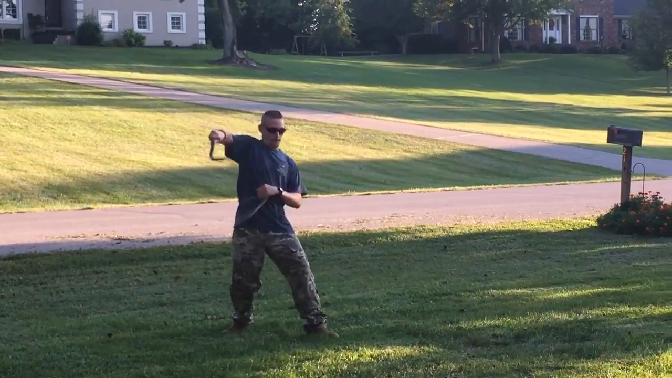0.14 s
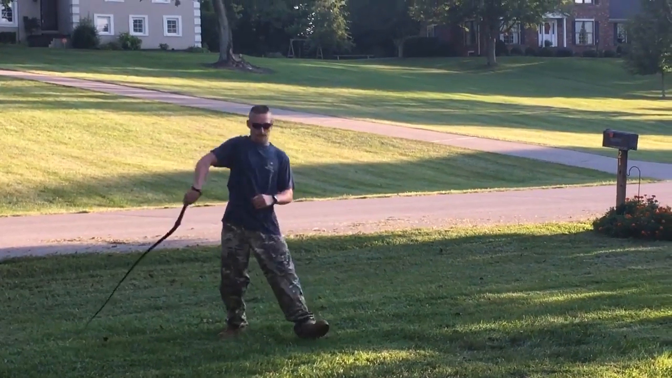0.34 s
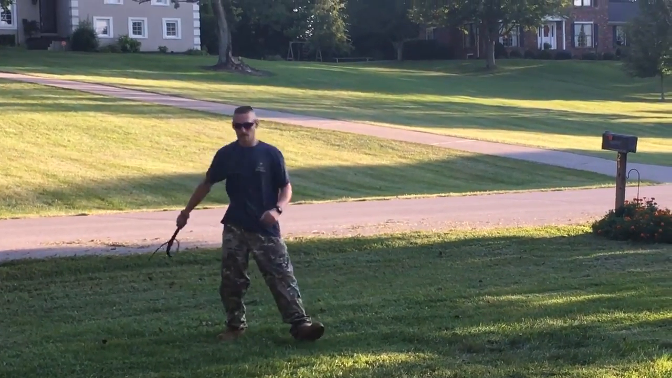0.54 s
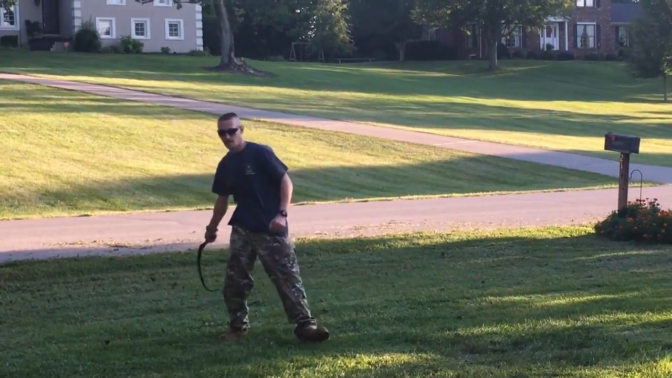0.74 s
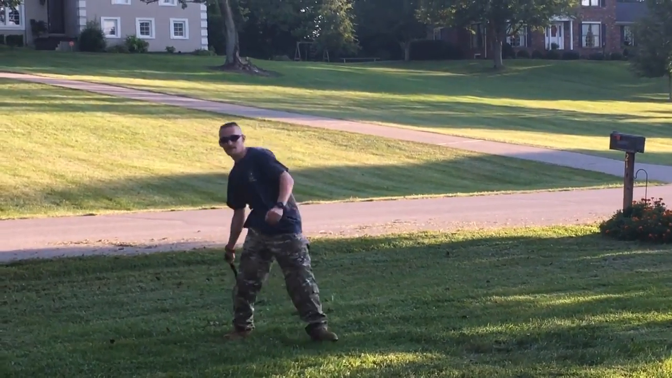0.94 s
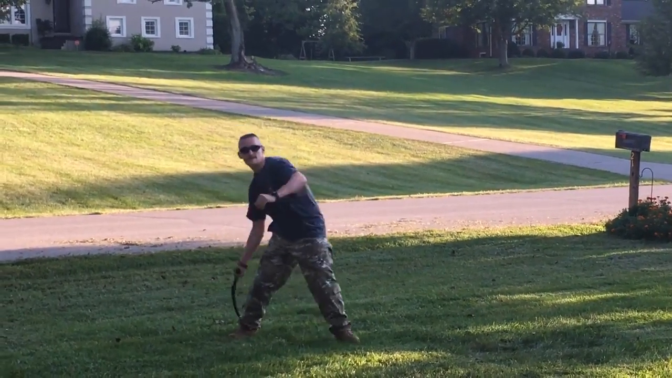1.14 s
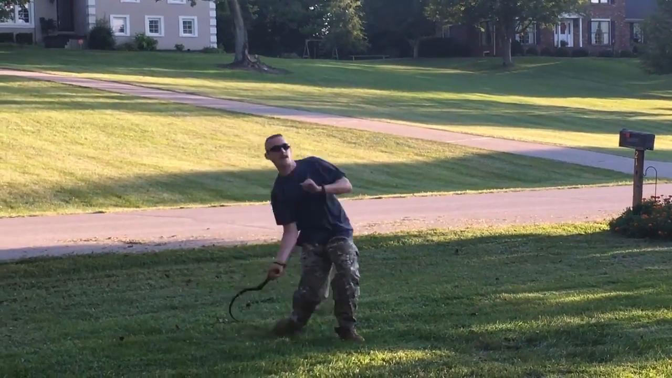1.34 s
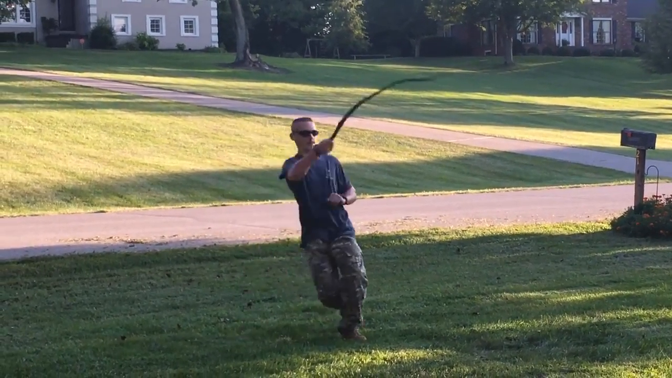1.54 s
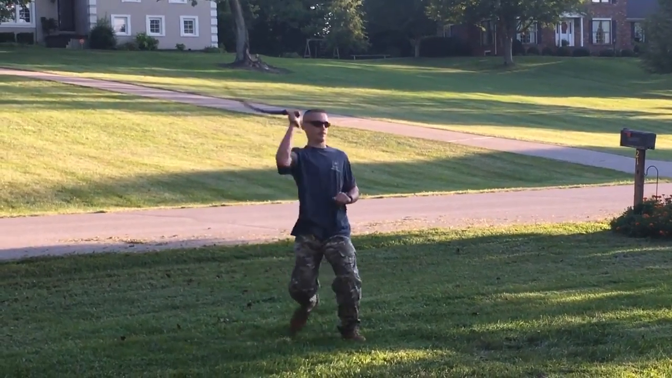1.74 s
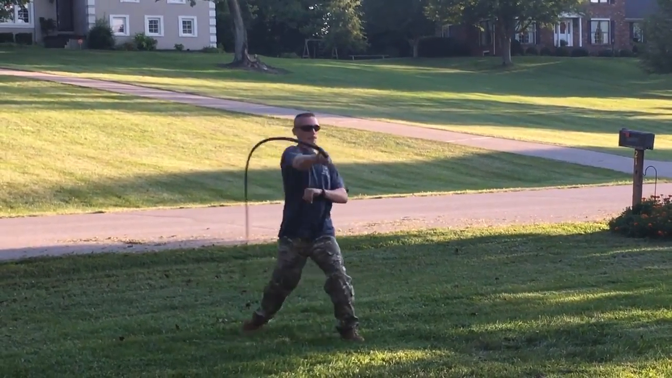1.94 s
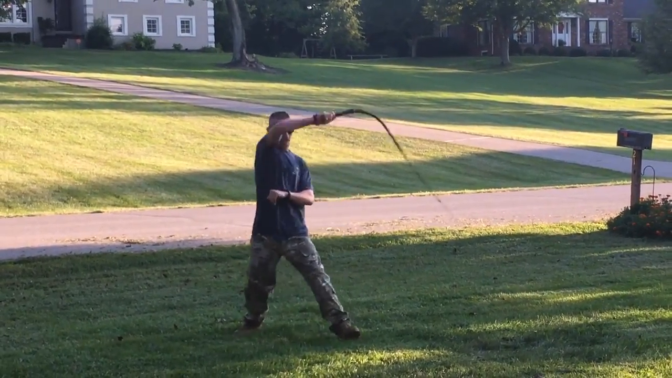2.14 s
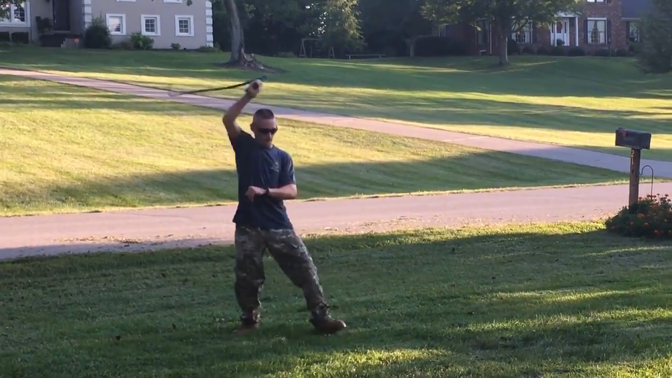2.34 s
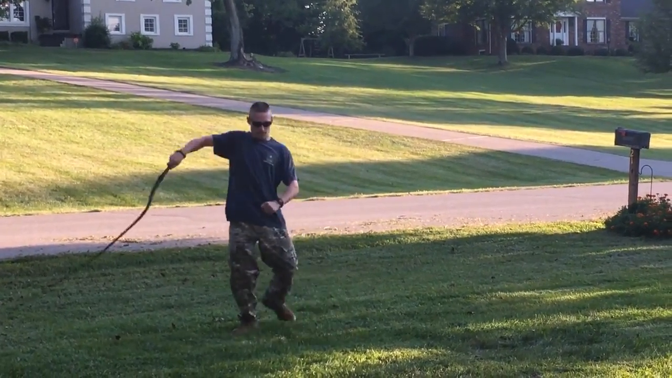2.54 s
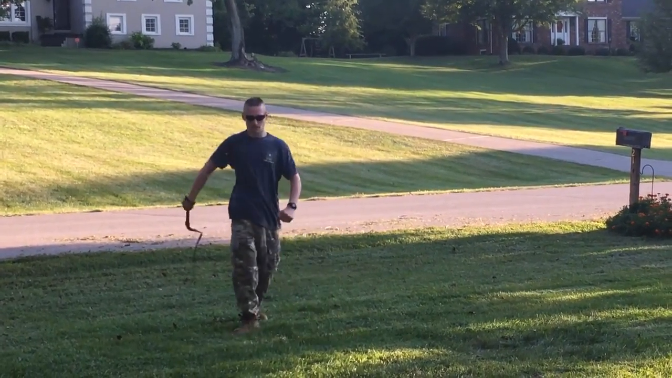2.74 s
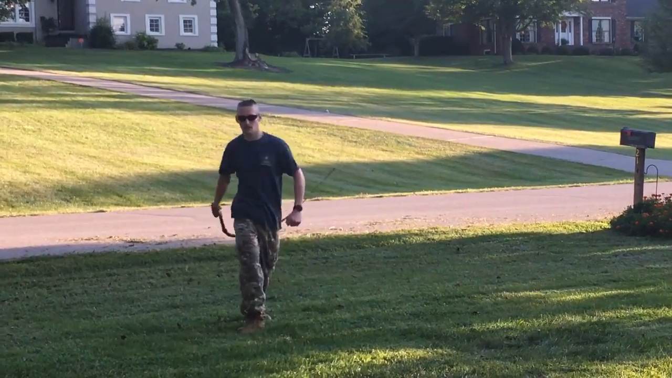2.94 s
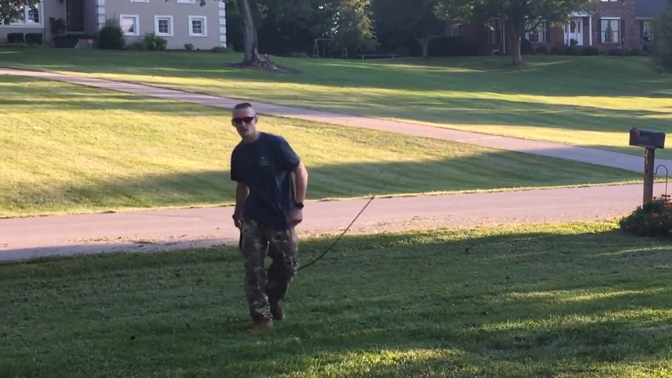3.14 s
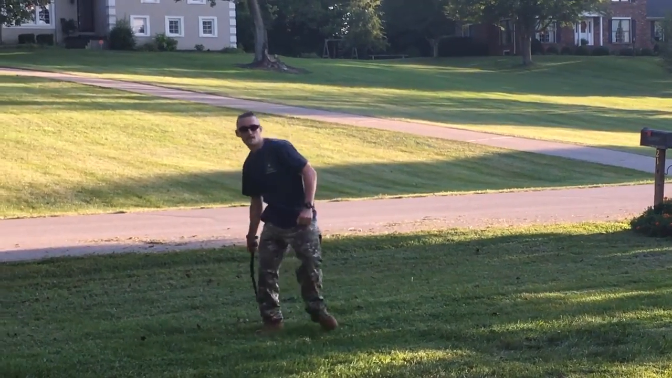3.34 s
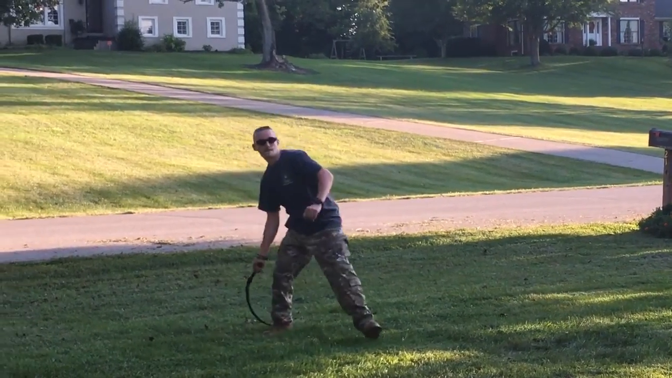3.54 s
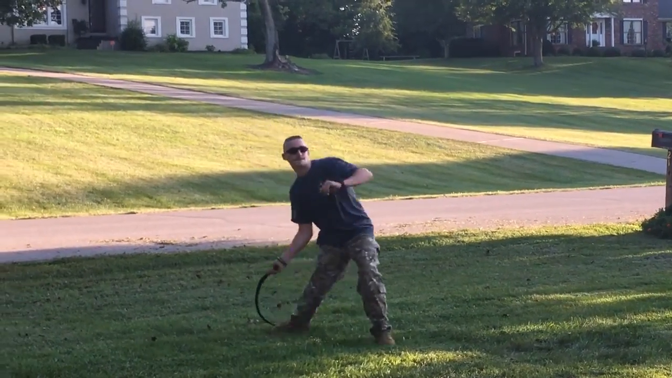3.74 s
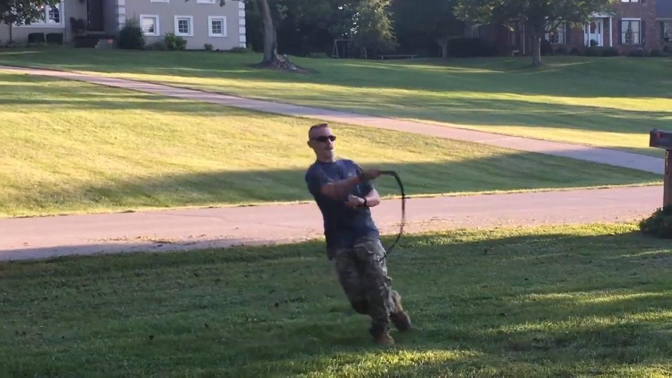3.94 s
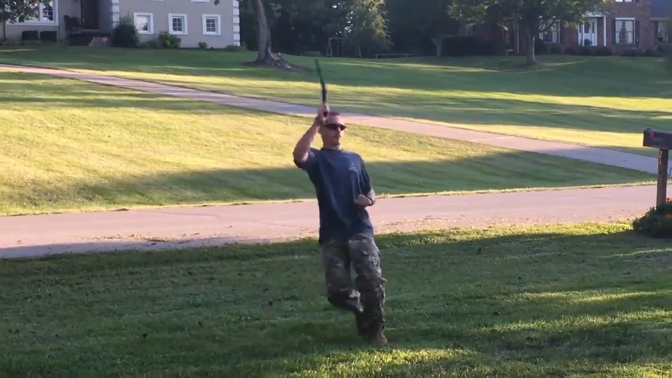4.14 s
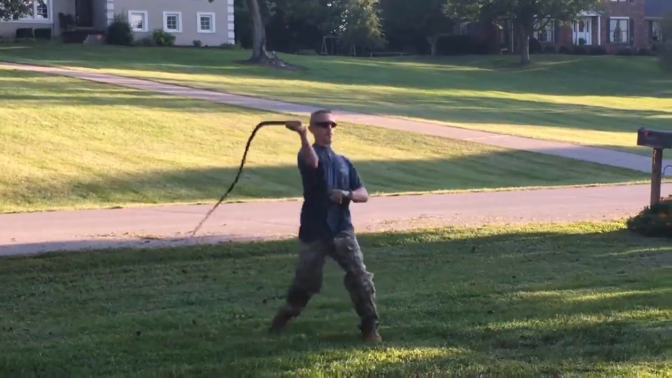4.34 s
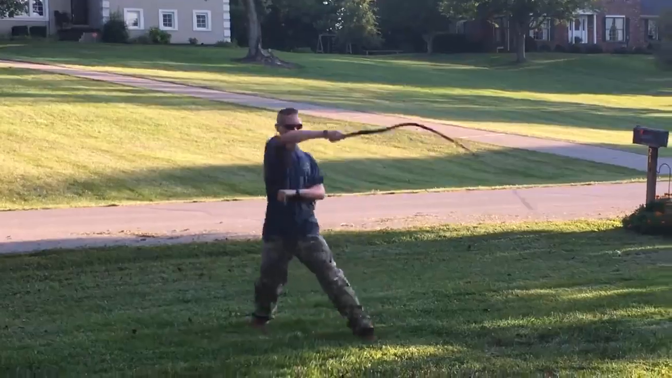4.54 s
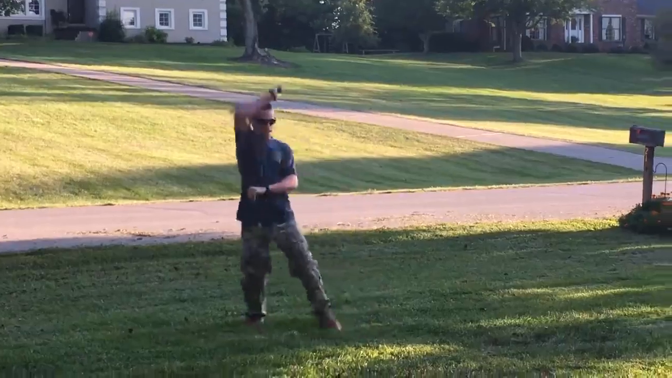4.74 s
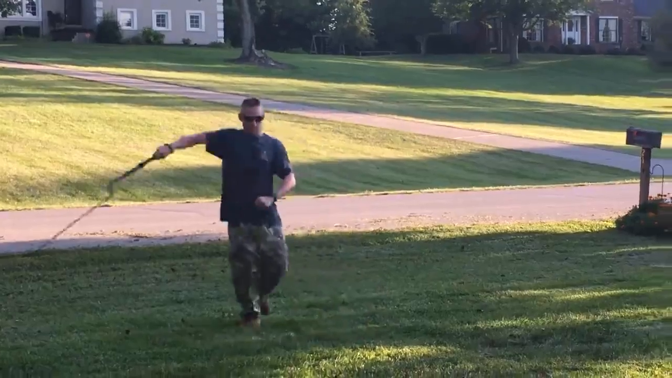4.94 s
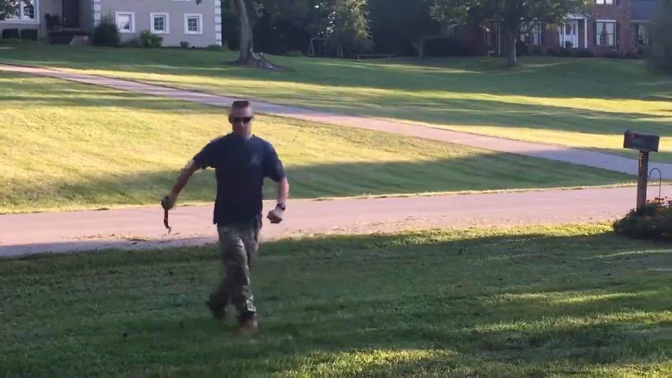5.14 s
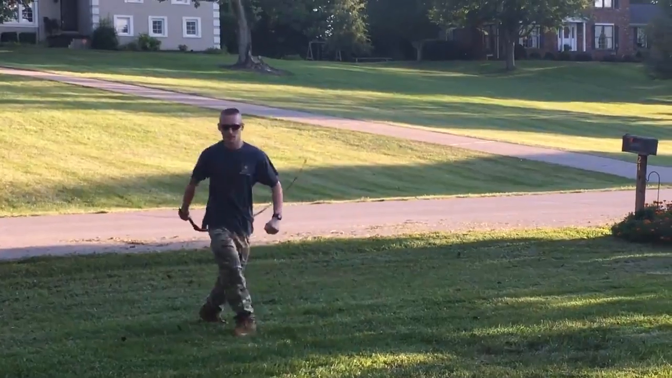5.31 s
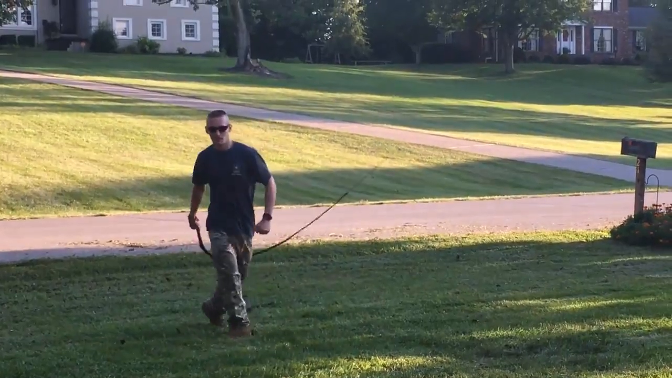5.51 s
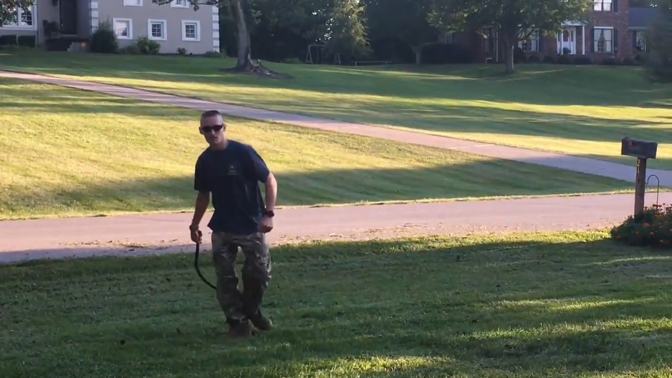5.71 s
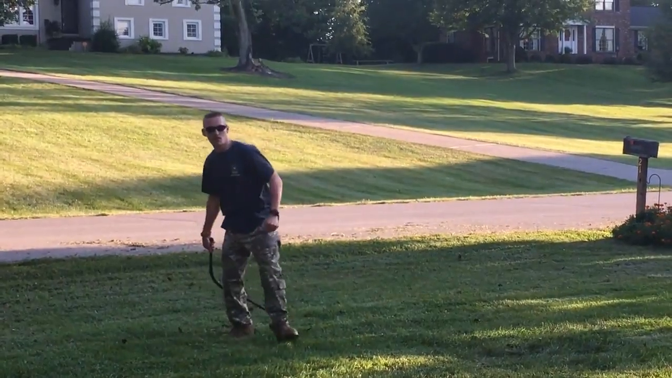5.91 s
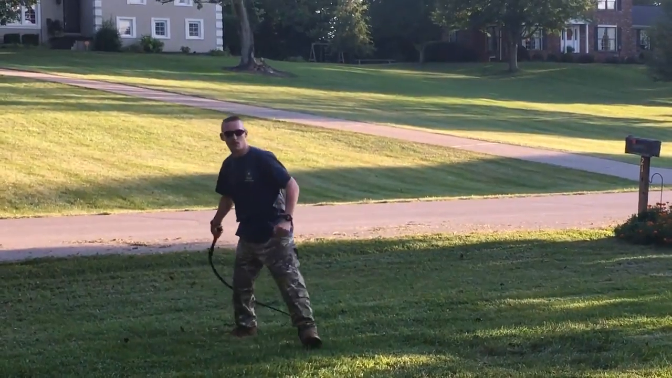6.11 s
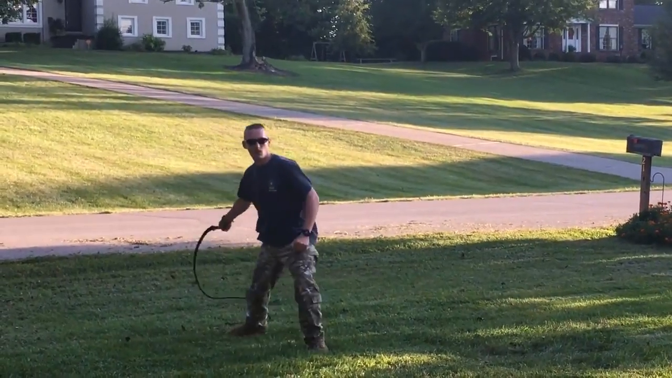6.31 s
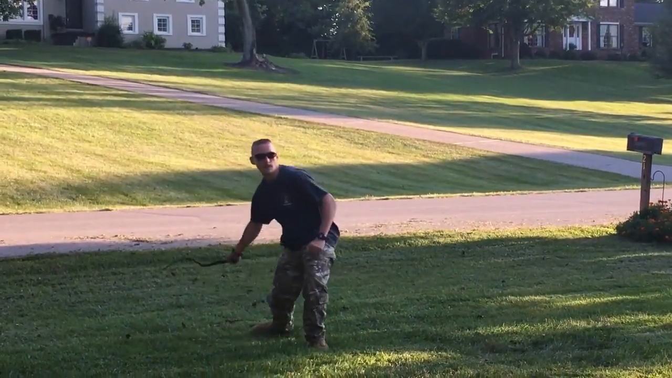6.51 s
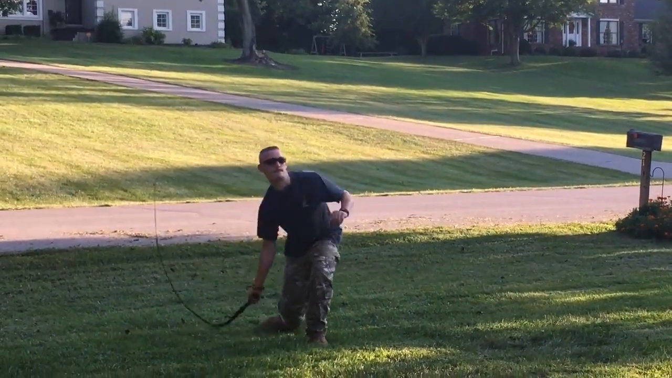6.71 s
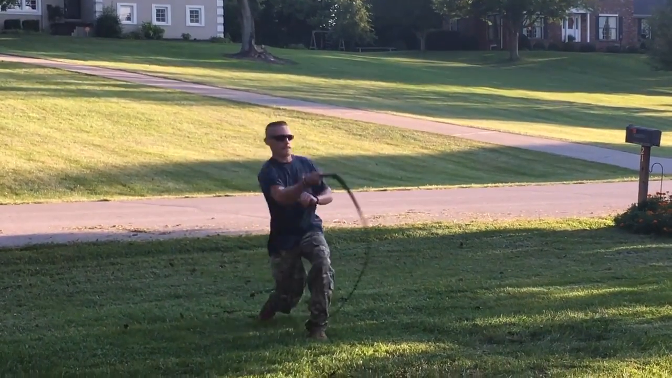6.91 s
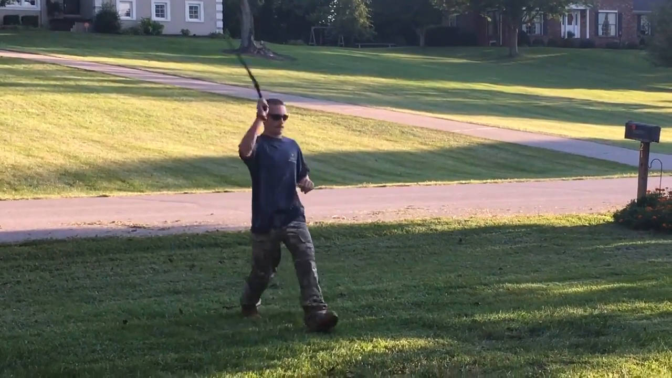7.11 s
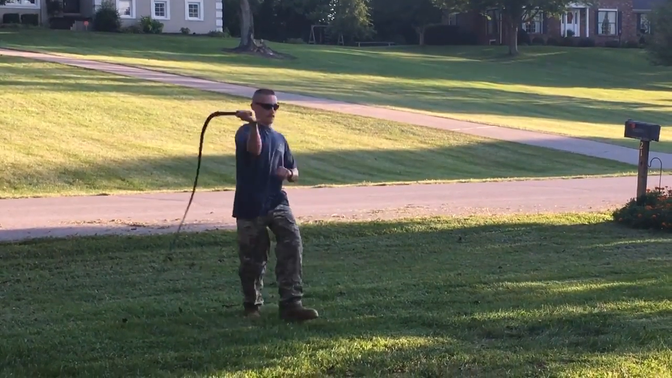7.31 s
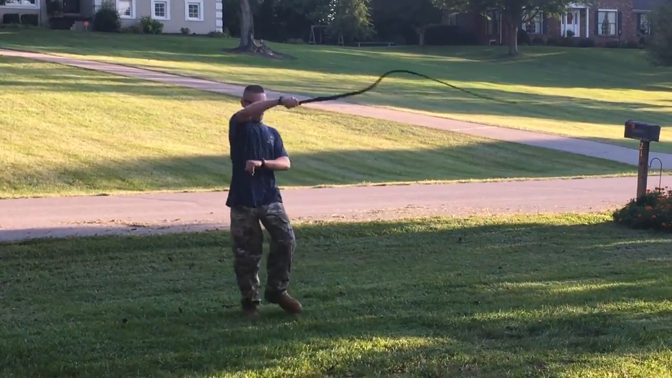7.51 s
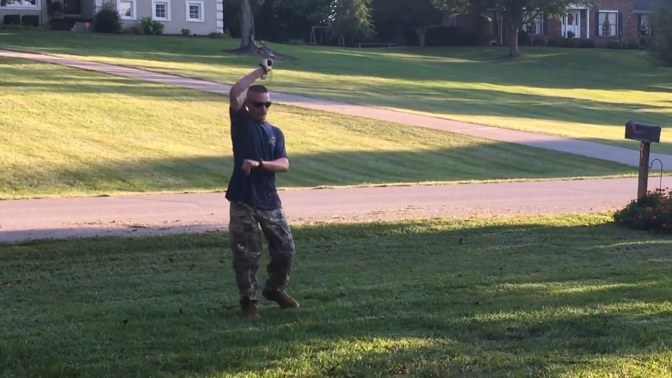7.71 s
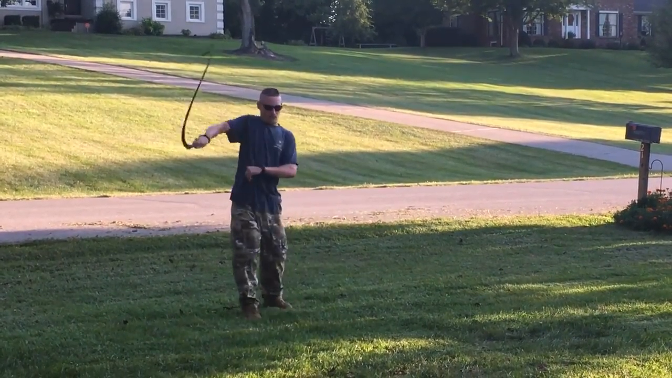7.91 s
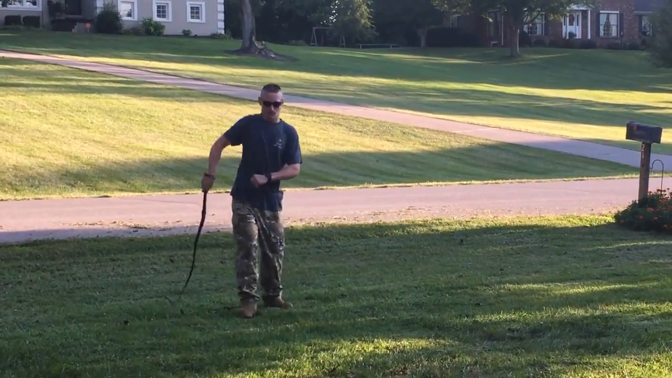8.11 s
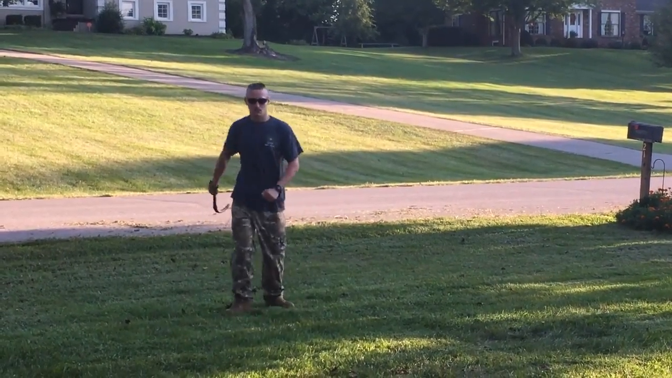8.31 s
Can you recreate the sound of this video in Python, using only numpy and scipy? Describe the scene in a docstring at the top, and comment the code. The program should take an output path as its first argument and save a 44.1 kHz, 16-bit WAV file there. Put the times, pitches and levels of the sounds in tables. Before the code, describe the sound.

A long whip cracks once, then in three groups of three, each crack about half a second apart within a group. Brief whistles and swishes lead into the cracks, which echo off house walls and distant trees. Most jolt the close microphone with a bass thump, briefly dipping the sound. Faint insects and a far engine hum lie behind on the open lawn.

```python
"""A lawn with houses and a tree line around it; a camera microphone stands close to a long whip.
The whip is cracked ten times, mostly in groups of three: the thong whistles, its supersonic tip sends
a shock, and the yard, the walls and the far trees answer. An engine hums far off and insects sing.
Most cracks jolt the microphone into a bass thump; after the strong thumps the camera's gain control
ducks the sound."""
import sys
import numpy as np
from scipy import signal
from scipy.fft import rfft, irfft, next_fast_len
from scipy.io import wavfile
from scipy.ndimage import uniform_filter1d, map_coordinates

SR = 44100
rng = np.random.default_rng(int(sys.argv[2]) if len(sys.argv) > 2 else 0)


def to_wav(s):
    """Save 16-bit WAV."""
    ch = np.atleast_2d(s).T  # columns
    pcm = np.round(np.clip(ch, -1, 1) * 32767)  # PCM
    wavfile.write(sys.argv[1], SR, pcm.astype(np.int16))


N = 368676
TIME = np.arange(N) / SR


def amp(db):
    """Decibels to gain."""
    return 10 ** (np.asarray(db) / 20)


def unit(x):
    """Scale to rms 1."""
    return x / np.sqrt(np.mean(x ** 2) + 1e-20)


def along(points, hz):
    """(Hz, value) points read on a log axis."""
    point_hz, values = np.transpose(points)
    return np.interp(np.log(hz + 1), np.log(point_hz + 1), values)


def curve(rows, t):
    """(s, value) rows joined by straight lines."""
    return np.interp(t, *np.transpose(rows))


def filtered(x, response):
    """Filter x with a gain given as a function of frequency."""
    size = next_fast_len(len(x) + 8192)
    return irfft(rfft(x, size) * response(np.fft.rfftfreq(size, 1 / SR)), size)[:len(x)]


def noise(spectrum, size, tilt_db=0):
    """Coloured noise of rms 1, tilted by so many dB per octave."""
    def colour(hz):
        return amp(along(spectrum, hz) + tilt_db * np.log2(np.maximum(hz, 200) / 2000))
    return unit(filtered(rng.standard_normal(size), colour))


def wobble(rate, size):
    """A smooth random curve with rate knots a second."""
    knots = rng.standard_normal(int(size * rate / SR) + 4)
    return map_coordinates(knots, [np.arange(size) * rate / SR])


def click(spectrum, size=1024):
    """The sharpest causal pulse with this spectrum (minimum phase), peak 1."""
    cepstrum = irfft(np.log(amp(along(spectrum, np.fft.rfftfreq(size, 1 / SR)))))
    cepstrum[1:size // 2] *= 2
    cepstrum[size // 2 + 1:] = 0
    pulse = irfft(np.exp(rfft(cepstrum)))
    return pulse / np.abs(pulse).max()


def add(track, s, sound):
    """Mix a sound into the track from time s."""
    start = round(s * SR)
    part = sound[:max(N - start, 0)]
    track[start:start + len(part)] += part


# Background of the open lawn: (frequency [Hz], relative level [dB])
AIR_SPECTRUM = [(22, -24.5), (50, 17), (90, 10), (160, 7), (300, -5), (550, -13.5), (1200, -12),
                (3000, -25.5), (5500, -26.5), (9000, -29), (11000, -33), (16000, -32.5)]

def open_air():
    """A quiet, nearly steady rumble all round the microphone."""
    return amp(-49.5 + 0.27 * wobble(5.3, N)) * noise(AIR_SPECTRUM, N)


# The engine as it reaches the lawn: (time [s], level [dB])
ENGINE_LEVEL = [(0, -45.5), (1.4, -49), (2.5, -76), (3.3, -50.5), (4, -67.5), (5.6, -44.5), (6.3, -45),
                (6.7, -48), (7.1, -65), (7.6, -55), (7.9, -49), (8.36, -41.5)]
# Its harmonics: (order [multiple of the firing cycle], relative level [dB])
ENGINE_ORDERS = [(2, -14), (4, 6.5), (5, -6.5), (6, -11.5), (7, -15), (8, -33.5), (9, -42.5), (12, -14.5),
                 (16, -25)]

def engine(cycle_hz=25.75):
    """An engine far off: only the low orders of its firing cycle carry."""
    phase = 2 * np.pi * np.cumsum(cycle_hz * (1 + 0.0037 * wobble(4.2, N))) / SR
    hum = np.zeros(N)
    for order, db in ENGINE_ORDERS:
        level = amp(db + 0.62 * wobble(6.9, N))
        hum += level * np.sin(order * phase + rng.uniform(0, 2 * np.pi))
    return amp(curve(ENGINE_LEVEL, TIME)) * unit(hum)


# The cricket holds each tempo for a while: (start [s], chirp period [s])
CRICKET_PERIODS = [(.064, .1822), (1.761, .1767), (4.079, .1902), (5.578, .1803)]
# The massed insects: (frequency [Hz], relative level [dB])
CHORUS_SPECTRUM = [(5500, -52), (6400, -16), (6750, -5.5), (7300, -9), (7500, -23), (7900, -1.5),
                   (8500, -4.5), (8680, -15), (9500, -19), (11000, -73)]

def insects(pitch_hz=6860, strokes_per_s=48, chirp_s=.085):
    """One cricket chirps evenly in four wing strokes that sag in pitch, over a steady chorus."""
    cricket, t = np.zeros(N), np.arange(int(chirp_s * SR)) / SR
    stroke = t * strokes_per_s % 1
    pulses = np.abs(np.sin(np.pi * stroke)) ** 0.64
    ends = [s for s, _ in CRICKET_PERIODS[1:]] + [N / SR]
    for (start, period), end in zip(CRICKET_PERIODS, ends):
        for s in np.arange(start, end - period / 4, period):
            hz = pitch_hz * (1 + 0.025 * (.5 - stroke) + .005 * wobble(500, len(t)))
            tone = np.sin(2 * np.pi * np.cumsum(hz) / SR)
            add(cricket, s, amp(-52 + rng.normal(0, 1)) * pulses * tone)
    chorus = amp(-59 + 1.3 * wobble(65, N)) * noise(CHORUS_SPECTRUM, N)
    drift_db = curve([(0, 0.56), (4, -0.43), (5.5, -2.4), (8.36, -1.6)], TIME)
    return (cricket + chorus) * amp(drift_db)


def whistle(hz, steady_cycles=5):
    """Vortices shed by the thong: a rough, fluttering tone whose phase holds for a few cycles."""
    flutter = amp(3 * wobble(45, len(hz)))
    cycles = np.cumsum(hz) / SR
    knots = rng.standard_normal((2, 2048))
    a, b = [map_coordinates(row, [cycles / steady_cycles], mode="wrap") for row in knots]
    return flutter * unit(a * np.sin(2 * np.pi * cycles) + b * np.cos(2 * np.pi * cycles))


# Thong hiss and lawn scatter, close to the microphone: (frequency [Hz], relative level [dB])
NEAR_SPECTRUM = [(60, -12), (250, 0.5), (500, -9), (750, -6.5), (1400, 0.5), (2500, -0.5), (4000, -2),
                 (4950, -10.5), (5800, -7), (8000, -17.5), (12200, -21), (16000, -30)]
# Slow swings round the body: (middle [s], length [s], pitch [Hz], hum [dB], hiss [dB])
SLOW_SWINGS = [(0.112, .22, 900, -62.5, -51), (1.267, 0.39, 470, -60.5, -71), (5.62, 0.4, 415, -60, -70),
               (6.038, 0.2, 304, -57.5, -66), (7.739, 0.39, 404, -58.5, -58.5)]

def swings(pitch_sag=0.116):
    """The slowly swung thong hums low; it swells and fades, sagging a little in pitch."""
    out = np.zeros(N)
    for middle, length, hz, hum_db, hiss_db in SLOW_SWINGS:
        arc = np.linspace(-.5, .5, int(length * SR))
        hum = amp(hum_db) * whistle(hz * (1 - pitch_sag * arc))
        hiss = amp(hiss_db) * noise(NEAR_SPECTRUM, len(arc))
        add(out, max(middle - length / 2, 0), np.cos(np.pi * arc) * (hum + hiss))
    return out


# Throws: (start [s], length [s], first pitch [Hz], last pitch [Hz], whistle [dB], hiss [dB])
THONG_THROWS = [(0.135, .07, 943, 1033, -49.5, -53.5), (1.543, .043, 1274, 1410, -37, -41),
                (1.583, .023, 1780, 2320, -25.5, -31), (2.084, 0.037, 1024, 1460, -36.5, -46.5),
                (4.019, .013, 1346, 1960, -24.5, -35), (4.029, 0.02, 2012, 2320, -30, -30.5),
                (4.045, 0.0326, 1843, 1595, -28, -39.5), (4.996, 0.018, 1800, 2065, -23.5, -33),
                (7.524, .041, 1093, 1900, -27.5, -40.5), (8.004, .033, 926, 1200, -41.5, -38.5)]

def throws(swell_db=10.5, edge_s=0.0033):
    """The thrown thong glides in pitch with its speed while its whistle and hiss swell."""
    out = np.zeros(N)
    for s, length, first_hz, last_hz, whistle_db, hiss_db in THONG_THROWS:
        t = np.arange(int(length * SR)) / SR
        swell = amp(swell_db * (t / length - 1))
        edges = np.minimum(np.minimum(t, length - t) / edge_s, 1)
        tone = amp(whistle_db) * whistle(first_hz + (last_hz - first_hz) * t / length)
        hiss = amp(hiss_db) * noise(NEAR_SPECTRUM, len(t), tilt_db=1.5)
        add(out, s, swell * edges * (tone + hiss))
    return out


# The tip's shock at close range: (frequency [Hz], relative level [dB])
SHOCK_SPECTRUM = [(60, -14.5), (250, -9.5), (550, 4), (900, -2), (1500, 4), (3400, -2), (5000, -6),
                  (6300, -10), (7400, -15), (11700, -20), (16000, -54)]
# The ten cracks, for run_up() and cracks(). The shock is directional, so each surface gets its own
# relative level: (time [s], shock [dB], run-up [dB], lawn [dB], lawn hold [s], lawn t60 [s],
# yard [dB], house [dB], trees [dB], brightness [dB/octave])
WHIP_CRACKS = [(.2170, .5, -26.5, -11.5, .019, 0.056, -18.5, -20, -44, .5),
               (1.6096, 1.5, -17.5, -11.5, .022, .065, -20.5, -18, -47, 0),
               (2.1168, -6, -25.5, -5.5, 0.0049, 0.18, -20, -16, -48, 2),
               (2.5772, 3.5, -18, -8.5, .016, .078, -12.5, -5, -40.5, 0),
               (4.0847, 0.5, -14.5, -13, 0.017, .077, -24.5, -19, -49.5, 0),
               (4.5729, 1, -19.5, -11.5, 0.023, 0.1, -13.5, -9.5, -42, 0.5),
               (5.013, 1, -17.5, -4, 0.016, 0.086, -11.5, 0, -37.5, -0.5),
               (7.0510, -10, -33, -14.5, 0.002, .075, -37, -43, -69, 0.5),
               (7.5605, -0.5, -26, -15, 0.0059, .12, -28.5, -31.5, -61, -1.5),
               (8.0412, 1, -20.5, -8.5, 0.022, .05, -12, -7, -37.5, 0.5)]

def run_up(cracker_hz=3200, rush_t60=.055, zip_t60=0.053):
    """As the loop races to the tip the air rushes louder and the thin cracker sings with it."""
    out = np.zeros(N)
    left_s = np.arange(SR // 25)[::-1] / SR
    for s, _, rush_db, *_ in WHIP_CRACKS:
        rush = amp(rush_db - 60 * left_s / rush_t60) * noise(SHOCK_SPECTRUM, len(left_s), tilt_db=-3)
        phase = 2 * np.pi * np.cumsum(cracker_hz * (1 + .025 * wobble(400, len(left_s)))) / SR
        zip_db = 19 + 2 * rush_db  # the cracker peaks with the square of the rush
        cracker = amp(zip_db - 60 * left_s / zip_t60) * np.sin(phase)
        add(out, s - left_s[0], rush + cracker)
    return out


def shock(min_gap_s=0.00022, crackle_db=-11, crackle_t60=0.02):
    """The supersonic tip: a front shock, a weaker rear one and a crackle from its frayed fibres."""
    t = np.arange(SR // 20) / SR
    pulse = click(SHOCK_SPECTRUM)
    out = amp(crackle_db - 60 * t / crackle_t60) * noise(SHOCK_SPECTRUM, len(t))
    add(out, 0, -pulse)
    add(out, min_gap_s * rng.uniform(1, 2), -pulse / 2)
    return out


def off_ground(x, share, delay_s=.00222):
    """The lawn sends a copy just behind the direct sound, which gives it a hollow ring."""
    return x + share * np.pad(x, (round(delay_s * SR), 0))[:len(x)]


def lawn_scatter(t, hold_s, t60, bright_db):
    """Close by, the lawn and the things on it scatter the shock: a burst that holds, then dies."""
    decay = amp(-60 * np.maximum(t - hold_s, 0) / t60)
    onset = 1 - np.exp(-t / .0015)
    flicker = amp(1.5 * wobble(900, len(t)))
    return onset * decay * flicker * off_ground(noise(NEAR_SPECTRUM, len(t), bright_db), share=0.067)


def dulled(x, t, corner_hz=4900, start_db=2, loss_db_per_s=45):
    """The air takes more treble from an echo the longer it travels."""
    treble = filtered(x, lambda hz: 1 - 1 / (1 + (hz / corner_hz) ** 8))
    return x - treble + amp(start_db - loss_db_per_s * t) * treble


# The yard's tail: (frequency [Hz], relative level [dB])
YARD_SPECTRUM = [(150, -55.5), (250, -22.5), (501, -26.5), (586, -15), (1060, -14.5), (1220, -10.5),
                 (1700, -5), (3010, -4), (3840, -2), (4820, -4), (11700, -17.5), (16000, -28)]

def yard_tail(t, bright_db, t60=0.58, rise_s=0.021):
    """Farther out, leaves and posts return the shock in uneven clumps."""
    envelope = amp(-60 * t / t60) * (1 - np.exp(-t / rise_s))
    clumps = amp(1.5 * wobble(250, len(t)) + 1.5 * wobble(1200, len(t)))
    return envelope * clumps * dulled(noise(YARD_SPECTRUM, len(t), bright_db), t)


# A crack off a hard surface: (frequency [Hz], relative level [dB])
WALL_SPECTRUM = [(150, -57), (500, -17.5), (1200, -3.5), (2200, 3.5), (3200, -3), (4200, 4), (5200, -15),
                 (8000, -15), (12000, -30.5), (16000, -38)]

def reflection(bright_db, smear_t60=0.11, smear_db=-12.5, snap_db=4):
    """A crack thrown back by a wall: a sharp front, smeared by ledges and corners."""
    t = np.arange(SR // 10) / SR
    front = amp(-60 * t / .016) * (1 - np.exp(-t / .0004))
    smear = amp(smear_db - 60 * t / smear_t60)
    out = (front + smear) * noise(WALL_SPECTRUM, len(t), bright_db)
    add(out, 0, -amp(snap_db) * click(WALL_SPECTRUM))
    return out


# Colour of the tree line's echo: (frequency [Hz], relative level [dB])
TREE_SPECTRUM = [(150, -28.5), (400, -12.5), (800, -5.5), (1500, 0.5), (2400, 2.5), (4000, -2), (5500, -10),
                 (8000, -13.5), (12000, -34), (16000, -62)]
# Its swell and decay: (delay [s], relative level [dB])
TREE_ENVELOPE = [(0, -35.5), (.15, -8), (.27, -1.5), (.37, 3), (.52, -1), (.7, -11.5), (1.0, -19.5),
                 (1.6, -37.5)]

def tree_echo(t):
    """The far trees answer last, dulled by the air."""
    level_db = curve(TREE_ENVELOPE, t) + 1.1 * wobble(21, len(t)) + 1.1 * wobble(240, len(t))
    return amp(level_db) * noise(TREE_SPECTRUM, len(t))


# Walls that answer every crack: (delay [s], level relative to the yard [dB], brightness [dB/octave])
WALL_ECHOES = [(0.0497, -8, 0.5), (.149, -14.5, -5.5), (.549, -15.5, -7)]
# Reflections that only the first crack sends to the microphone:
# (time [s], level [dB], brightness [dB/octave])
FIRST_CRACK_SLAPS = [(.2637, -12.5, 3.5), (.318, -25, 3), (.329, -26, 3), (.348, -25, 1)]

def cracks(house_delay_s=.0817, trunk_delays_s=(0.23, .56)):
    """Each shock reaches the microphone first, then its echoes from lawn, yard, walls and trees."""
    out, t = np.zeros(N), np.arange(int(1.6 * SR)) / SR
    for s, shock_db, _, lawn_db, hold_s, t60, yard_db, house_db, trees_db, bright_db in WHIP_CRACKS:
        add(out, s, amp(shock_db + 2) * off_ground(shock(), share=0.63))
        add(out, s, amp(lawn_db - 1.5) * lawn_scatter(t, hold_s, t60, bright_db))
        add(out, s, amp(yard_db - 0.5) * yard_tail(t, bright_db))
        add(out, s + house_delay_s, amp(house_db) * reflection(bright_db=3))
        for delay, wall_db, wall_bright_db in WALL_ECHOES:
            add(out, s + delay, amp(yard_db + wall_db) * reflection(wall_bright_db))
        add(out, s, amp(trees_db) * tree_echo(t))
        for delay in rng.uniform(*trunk_delays_s, size=4):  # single trunks stand out of the tree line
            add(out, s + delay, amp(trees_db + 3) * reflection(bright_db=-4))
    for s, db, bright_db in FIRST_CRACK_SLAPS:
        add(out, s, amp(db) * reflection(bright_db))
    return out


# The thong pulled through the grass: (start [s], length [s], level at the end [dB])
GRASS_DRAGS = [(1.39, .16, -56.5), (2.035, .07, -57.5), (3.84, 0.26, -53), (6.05, .14, -56),
               (6.84, .2, -54)]
# Faint ticks, two of them just before a crack: (time [s], relative level [dB])
FAINT_TICKS = [(2.036, -41), (3.998, -45.5), (4.062, -41), (6.6666, -40.5), (7.4355, -43), (8.019, -40)]

def grass(swell_db=13.5, tick_t60=0.034):
    """The thong slides ever faster through the grass; a faint tick is heard here and there."""
    out, t = np.zeros(N), np.arange(SR // 10) / SR
    blades = [(1000, -10.5), (4000, -7.5), (9000, -7.5), (16000, -12.5)]  # (frequency [Hz], level [dB])
    for s, length, db in GRASS_DRAGS:
        size = int(length * SR)
        level_db = db + np.linspace(-swell_db, 0, size) + 3.5 * wobble(350, size)
        add(out, s, amp(level_db) * noise(blades, size))
    for s, db in FAINT_TICKS:
        add(out, s, amp(db - 7 - 60 * t / tick_t60) * noise(blades, len(t)))
    return out


# Bass thumps under most cracks, with a faint, higher one under the eighth:
# (time [s], relative level [dB], first jolt [cycles])
BASS_THUMPS = [(1.610, -4, .95), (2.577, -6.5, 0.66), (4.084, -7, 0.88), (4.576, -5, .9),
               (5.016, -2.5, 0.56), (7.052, -30, 3), (8.043, -3.5, 0.71)]

def thumps(swing_hz=54.3, peak_s=0.0075, jolt_s=0.0023):
    """The microphone is jolted, then swings back to rest in two or three slow cycles."""
    out, t = np.zeros(N), np.arange(SR // 6) / SR
    envelope = (t / peak_s * np.exp(1 - t / peak_s)) ** 0.88
    for s, db, jolt in BASS_THUMPS:
        cycles = swing_hz * t + jolt * (1 - np.exp(-t / jolt_s))  # the first swing is the quickest
        add(out, s, amp(db + 2) * envelope * np.sin(2 * np.pi * cycles))
    return out


# The coasting thong: (start [s], first pitch [Hz], whistle [dB], hiss [dB], braking time [s])
THONG_COASTS = [(7.058, 3610, -29.5, -29, .015), (7.069, 935, -42.5, -47, 0.045)]

def coasts(length_s=0.4, drag_power=.6, extra_fade_db_per_s=107.5):
    """Air brakes the thong after the eighth crack; pitch and level fall with its speed."""
    out, t = np.zeros(N), np.arange(int(length_s * SR)) / SR
    for s, hz, whistle_db, hiss_db, braking_s in THONG_COASTS:
        speed = (1 + t / braking_s) ** -drag_power
        tone = amp(whistle_db) * whistle(hz * speed)
        hiss = amp(hiss_db) * noise(NEAR_SPECTRUM, len(t))
        add(out, s, amp(-extra_fade_db_per_s * t) * speed * (tone + hiss))
    return out


def scene():
    """The whip close up over the quiet of the neighbourhood, on one microphone."""
    air = open_air()
    whip = swings() + grass() + throws() + run_up() + cracks() + coasts()
    return (air + engine() + insects() + whip + thumps())[None]


def gain_control(x, threshold_db=-22, release_db_per_s=26, attack_s=0.067, bass_extra=0.502):
    """Strong bass turns the camera's gain down, the low end most; it recovers at a steady rate."""
    bass = filtered(x, lambda hz: 1 / (1 + (hz / 300) ** 4))
    bass_db = 10 * np.log10(np.abs(uniform_filter1d(bass ** 2, SR // 50)) + 1e-12)
    excess_db = np.maximum(bass_db - threshold_db, 0)
    recovery_db = release_db_per_s * TIME
    held_db = np.maximum.accumulate(excess_db + recovery_db) - recovery_db
    pole = np.exp(-1 / (attack_s * SR))
    cut_db = signal.lfilter([1 - pole], [1, -pole], held_db)
    slow_cut_db = signal.lfilter([1 - pole], [1, -pole], cut_db)
    return amp(-cut_db) * (x - bass + amp(-bass_extra * slow_cut_db) * bass)


def record(dry, top_hz=15900):
    """The camera ducks after thumps, rounds off the peaks and keeps nothing above its band limit."""
    ducked = gain_control(dry[0])
    rounded = ducked / (1 + ducked ** 6) ** (1 / 6)
    return filtered(rounded, lambda hz: hz < top_hz)[None]


dry = scene()
out = record(dry)
to_wav(out)
```